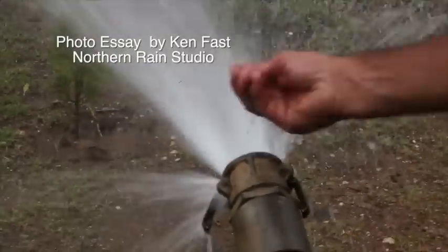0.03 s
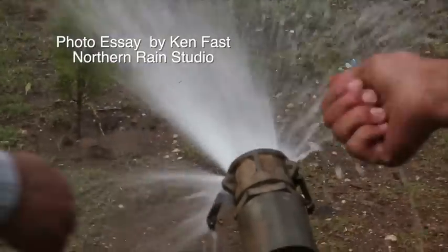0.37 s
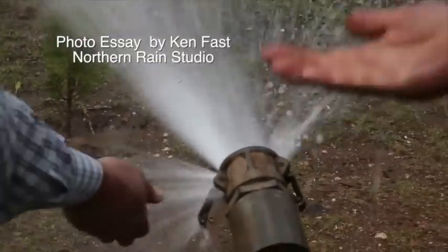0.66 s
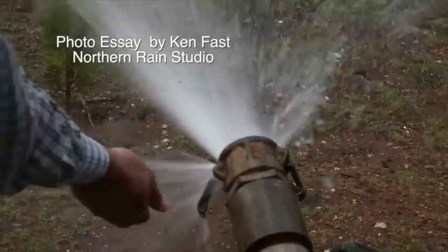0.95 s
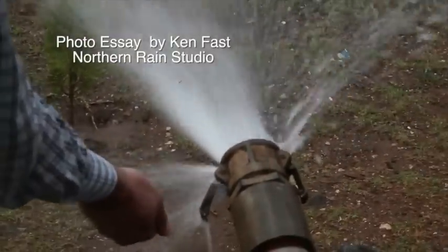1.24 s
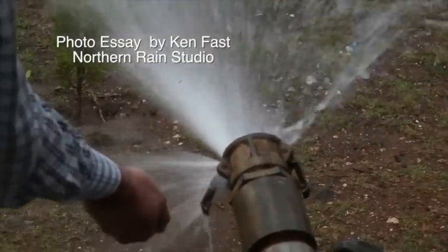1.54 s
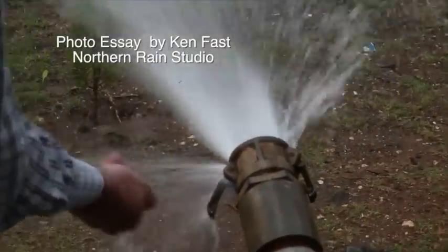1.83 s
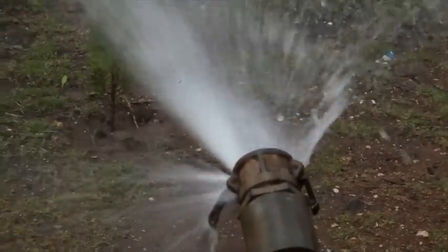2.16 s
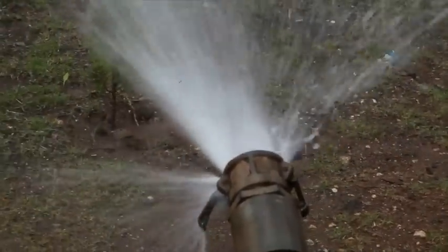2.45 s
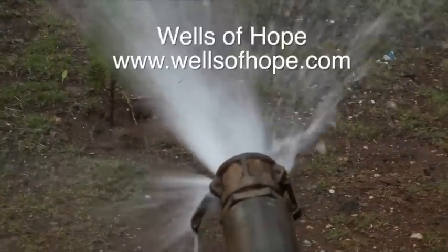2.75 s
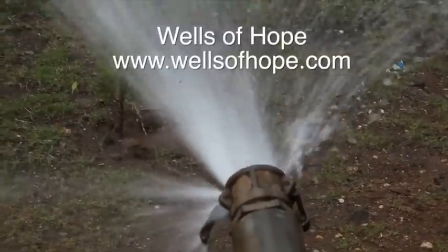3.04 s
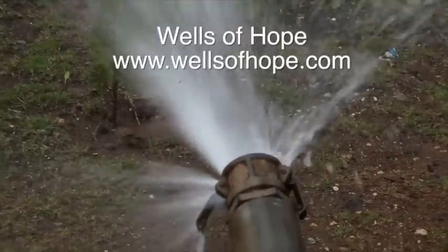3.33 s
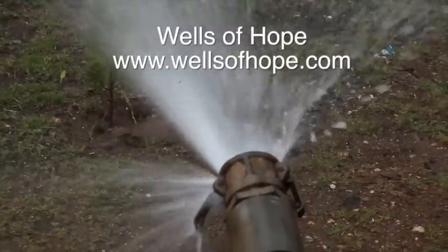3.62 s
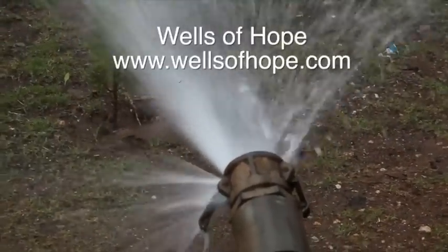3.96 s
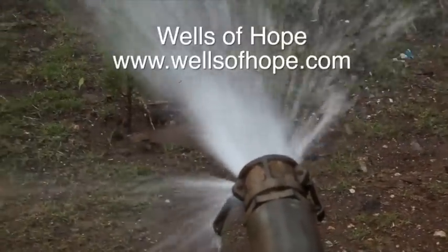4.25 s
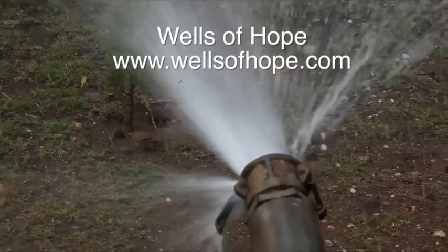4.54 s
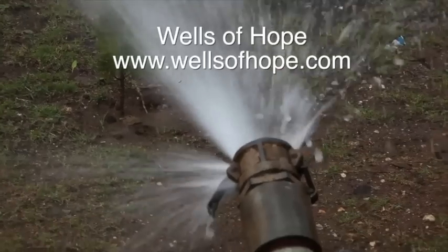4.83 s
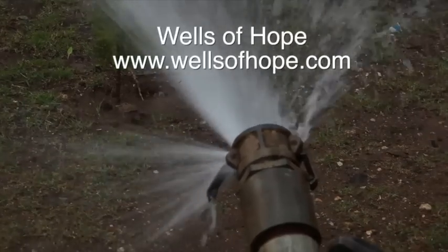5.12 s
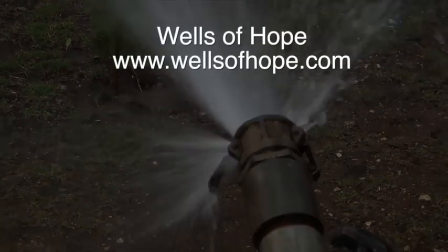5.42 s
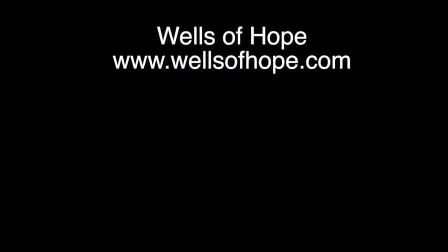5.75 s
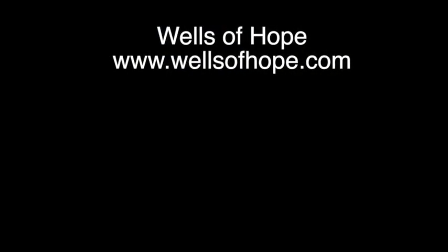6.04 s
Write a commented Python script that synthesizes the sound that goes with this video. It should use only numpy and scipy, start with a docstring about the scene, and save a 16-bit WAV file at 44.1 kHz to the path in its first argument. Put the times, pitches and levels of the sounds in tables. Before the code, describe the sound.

Water sprays under pressure from the coupling of a steel pipe, outdoors and close to the microphone. From the start there is a bright, steady, sputtering hiss with a slightly whistly edge and a fine patter of drops. A coarser gush sits below it, and the pipe rumbles faintly underneath. The flow swells gently between about 0.7 and 1.3 seconds, and two sharp drops snap at around 1.2 and 1.3 seconds. From 1.5 to 2.5 seconds the tone of the spray slides subtly, with two softer drop ticks just after 2 seconds. The jet surges mildly again near 4.2 and 5 seconds, with a few faint ticks and one barely audible dull knock in the pipe at about 4.9 seconds. From 5.3 seconds everything fades, reaching silence at about 5.8 seconds.

```python
"""Water spraying from a well pipe

Water under pressure escapes the coupling of a steel pipe, outdoors, close by. One slowly surging flow
drives the sputtering hiss, the drops that snap in it, the coarse gush and the pipe's rumble.
Near reflections colour the sound; their bands slide together as an arm draws back. The end fades out."""
import sys
import numpy as np
from scipy import signal
from scipy.fft import rfft, irfft, next_fast_len
from scipy.io import wavfile
from scipy.ndimage import map_coordinates

SR = 44100
rng = np.random.default_rng(int(sys.argv[2]) if len(sys.argv) > 2 else 0)


def store_pcm(level_fs):
    """Save levels as 16-bit WAV."""
    pcm = np.round(np.clip(level_fs, -1, 1) * 32767).astype(np.int16)
    wavfile.write(sys.argv[1], SR, np.atleast_2d(pcm).T)


N = 268111

# slow surge of the jet: (time [s], strength [dB])
FLOW_SURGE = [(0, -0.2), (0.3, 0.6), (0.5, 0.3), (0.68, 1.5), (1.2, 2.1), (1.8, -0.0), (2.6, -0.5),
              (3.4, -0.1), (3.9, 0.16), (4.15, 1.95), (4.35, 0.8), (5.05, 1.9), (5.3, 0.35)]


def jet(flow_db):
    """The stream tears into slugs and sheets that flare the hiss and throw drops."""
    # fine spray: (frequency [Hz], level [dB])
    spray_spectrum = [(3000, -48), (3800, -11), (4250, -7), (4650, -1), (5150, -1.5), (5450, -1),
                      (5750, -1.8), (6200, -1), (6900, -1.5), (8100, -12), (9200, -25), (10800, -35.5),
                      (11700, -33), (15700, -51.5)]
    # coarse stream: (frequency [Hz], level [dB])
    gush_spectrum = [(380, -34), (450, -14.5), (510, -2), (700, -1.5), (830, -6), (950, -4.5), (1200, -2.5),
                     (1500, -1.5), (1850, -3), (2600, 0.5), (3200, 1), (3900, -1.5), (4400, -10),
                     (5600, -42.5)]
    # one drop: (frequency [Hz], level [dB])
    drop_spectrum = [(300, -26), (1200, -9.5), (3500, -3.5), (4800, 0), (6600, 0.5), (8000, -11.5),
                     (9300, -28), (15000, -41.5)]
    # loudest drops: (time [s], level [dB])
    loud_drops = [(1.1517, -3), (1.327, -2.5), (2.027, -10.5), (2.1738, -12), (3.088, -15), (4.7543, -12),
                  (5.2026, -14)]
    push_db = flow_db + .6 * wobble(rate_hz=24)  # quick surges
    tearing_db = .75 * wobble(95) + 1.35 * wobble(280) + 1.35 * wobble(900)
    sputter_db = tearing_db + .04 * np.minimum(tearing_db ** 2, 25)  # flares outweigh lulls
    spray = turbulence(spray_spectrum, sputter_db)
    impacts = patter(rate_hz=1100, spread_db=3.2) * amp(.6 * sputter_db)
    drizzle = unit_rms(coloured(impacts, drop_spectrum))
    hiss = amp(push_db) * (amp(-22.5) * spray + amp(-29.5) * drizzle)
    core_db = .6 * sputter_db + .52 * wobble(60)  # the heavy core flutters less
    gush = amp(-29.5 + .35 * push_db) * turbulence(gush_spectrum, core_db)
    return hiss + gush + pulses(loud_drops, drop_spectrum)


def pipe(flow_db):
    """Churning water rumbles in the pipe, slowly growing; one slug knocks."""
    # flow inside the pipe: (frequency [Hz], level [dB])
    rumble_spectrum = [(25, -63), (50, -37.5), (85, -12.5), (150, -12.5), (200, -4.5), (255, 0),
                       (360, -3.5), (440, -12), (560, -34.5)]
    # slug impact: (time [s], level [dB])
    knocks = [(4.906, -24)]
    # one slug: (frequency [Hz], level [dB])
    knock_spectrum = [(35, -46), (100, -2), (280, -5.5), (450, -4), (1200, -41)]
    t = np.arange(N) / SR
    rise_db_per_s = .2
    rumble_db = -39.5 + .25 * flow_db + rise_db_per_s * (t - t.mean())
    rumble = amp(rumble_db) * turbulence(rumble_spectrum, .9 * wobble(24))
    return rumble + pulses(knocks, knock_spectrum)


def reflections(x, gain, count):
    """Adds weak copies off pipe and ground; delays wander with the hand-held microphone."""
    fine = signal.resample_poly(x, up=4, down=1)
    copies = np.zeros(N)
    for delay_s in rng.uniform(.0015, .007, count):
        read_at = np.arange(N) - SR * (delay_s + .00005 * wobble(1.2))
        copies += np.interp(4 * read_at, np.arange(len(fine)), fine, left=0)
    return x + gain * copies


def interference(x):
    """Direct and reflected sound add or cancel in sliding bands; a whistly edge follows the flow."""
    # path change as the arm draws back: (time [s], shift [0-1])
    path_shift = [(1.45, 0.12), (1.75, 0.27), (2, 0.62), (2.4, 0.77), (4, 1)]
    # reflection bands: (centre before [Hz], centre after [Hz], width [Hz],
    # gain before [dB], gain at turn [dB], gain after [dB], shift at turn [0-1])
    bands = [(696, 684, 55, 2, 0.7, -0.8, .6), (1362, 1130, 60, -5.5, 3, 0.5, .6),
             (1754, 1320, 267, 3.2, 5.5, 5.5, .3), (2170, 2130, 125, 0.5, -6.5, -4.5, 1),
             (2600, 2621, 192, 3, -1.6, -1, .6), (3350, 3750, 250, -7.8, 0.5, -1.3, .6),
             (3160, 3130, 100, -1, 2.5, .8, 0.9), (3978, 3990, 220, 1.3, -4, 1.1, .72),
             (4660, 4625, 240, .6, -1.5, 1, .6), (6290, 6110, 230, 4.4, 3.5, 1.5, .65)]
    hz, t, spectra = signal.stft(x, SR, nperseg=2048, noverlap=1536)
    shift = curve(path_shift, t)

    def bell(before_hz, after_hz, width_hz):
        centre_hz = before_hz + (after_hz - before_hz) * shift
        return np.exp(-((hz[:, None] - centre_hz) / width_hz) ** 2)

    notch_db = -14.5 * bell(1120, 807, width_hz=57)
    edge_db = 1.7 * curve(FLOW_SURGE, t) * bell(4680, 4680, width_hz=240)
    colour_db = notch_db + edge_db
    for before_hz, after_hz, width_hz, before_db, turn_db, after_db, turn in bands:
        height_db = np.interp(shift, [0, turn, 1], [before_db, turn_db, after_db])
        colour_db += height_db * bell(before_hz, after_hz, width_hz)
    return signal.istft(spectra * amp(colour_db), SR, nperseg=2048, noverlap=1536)[1][:N]


def turbulence(spectrum, swell_db):
    """Noise, modulated then coloured; rms 1."""
    return unit_rms(coloured(rng.standard_normal(N) * amp(swell_db), spectrum))


def patter(rate_hz, spread_db):
    """Random impulses, many small, a few large."""
    struck = rng.random(N) < rate_hz / SR
    polarity = rng.choice([-1, 1], N)
    return struck * polarity * amp(spread_db * np.minimum(rng.exponential(size=N), 4))


def pulses(events, spectrum):
    """One short coloured pulse per event."""
    pulse = coloured(np.arange(N) == 0, spectrum)[:SR // 10]
    train = np.zeros(N)
    for time_s, peak_db in events:
        train[round(time_s * SR)] += amp(peak_db)
    return signal.fftconvolve(train, pulse / np.abs(pulse).max())[:N]


def coloured(x, spectrum):
    """Minimum-phase filter; spectrum interpolated over log frequency."""
    size = 2 * next_fast_len(N // 2 + 8192)
    hz = np.fft.rfftfreq(size, 1 / SR)
    knots_hz, knots_db = np.transpose(spectrum)
    gain_db = np.interp(np.log(hz + 1), np.log(knots_hz + 1), knots_db)
    cepstrum = irfft(np.log(amp(gain_db)))
    cepstrum[1:size // 2] *= 2  # fold onto the causal half
    cepstrum[size // 2 + 1:] = 0
    return irfft(rfft(x, size) * np.exp(rfft(cepstrum)), size)[:N]


def wobble(rate_hz):
    """Smooth random curve, rate_hz knots a second."""
    return map_coordinates(rng.standard_normal(N // 8), [np.arange(N) * rate_hz / SR], mode="wrap")


def curve(points, t):
    """Breakpoints interpolated at times t."""
    return np.interp(t, *np.transpose(points))


def amp(db):
    """Decibels to gain."""
    return 10 ** (np.asarray(db) / 20)


def unit_rms(x):
    """Scaled to rms 1."""
    return x / np.sqrt(np.mean(x ** 2) + 1e-20)


def scene():
    """Jet and pipe, the same in both channels."""
    flow_db = curve(FLOW_SURGE, np.arange(N) / SR)
    water = interference(reflections(jet(flow_db), gain=.04, count=6) + pipe(flow_db))
    return np.array([water, water])


def record(dry):
    """Fade to silence, then band limits."""
    # fade-out: (time [s], gain [linear])
    fade = [(5.3, 0.84), (5.5, 0.55), (5.7, 0.22), (5.8, 0.033), (5.82, 0)]
    low_cut_hz, top_hz = 35, 15900
    faded = dry * curve(fade, np.arange(N) / SR)
    size = next_fast_len(N + 8192)
    hz = np.fft.rfftfreq(size, 1 / SR)
    passband = (hz < top_hz) * hz ** 4 / np.sqrt(hz ** 8 + low_cut_hz ** 8)
    return irfft(rfft(faded, size) * passband, size)[:, :N]


dry = scene()
out = record(dry)
store_pcm(out)
```